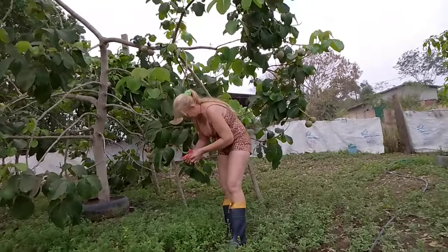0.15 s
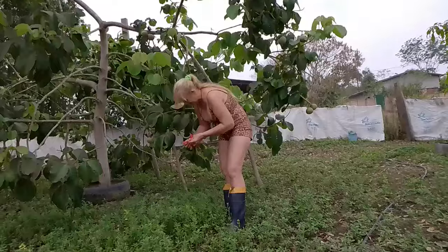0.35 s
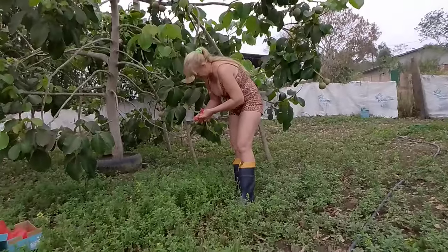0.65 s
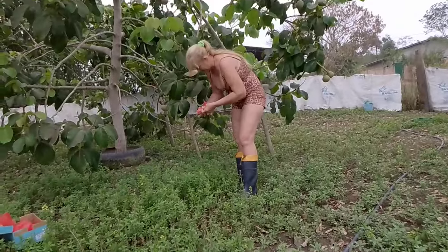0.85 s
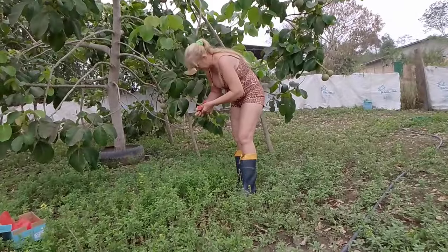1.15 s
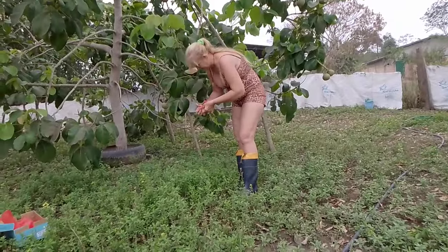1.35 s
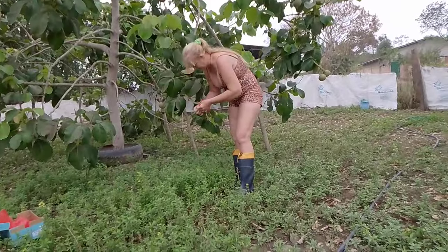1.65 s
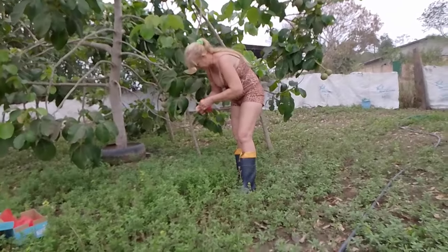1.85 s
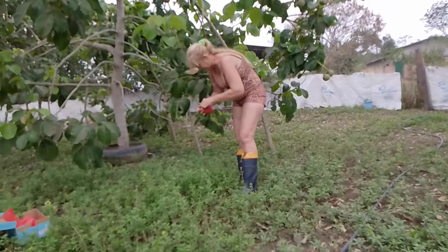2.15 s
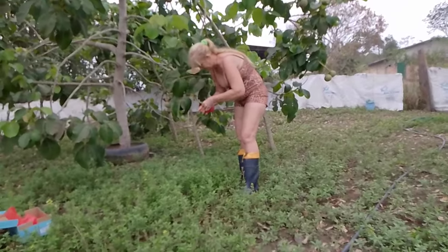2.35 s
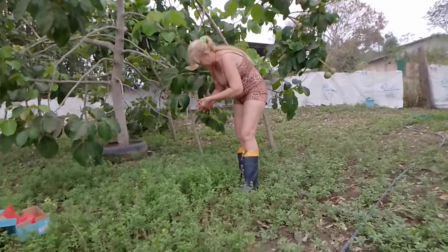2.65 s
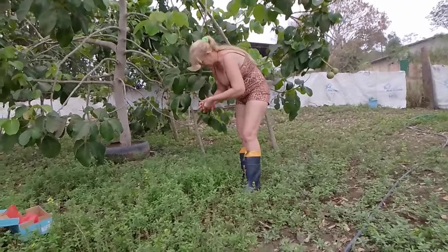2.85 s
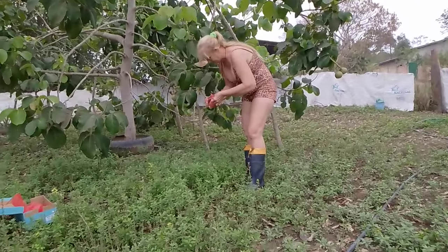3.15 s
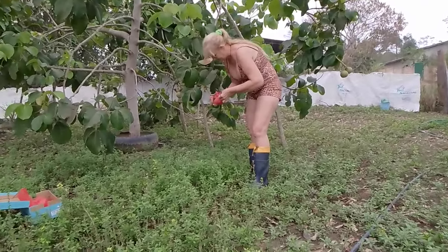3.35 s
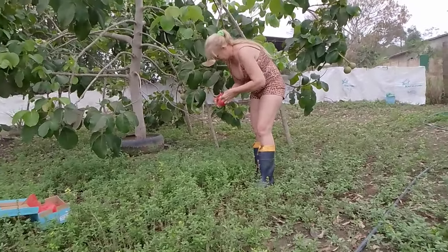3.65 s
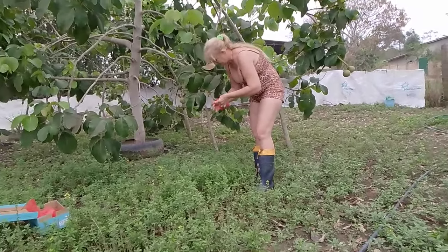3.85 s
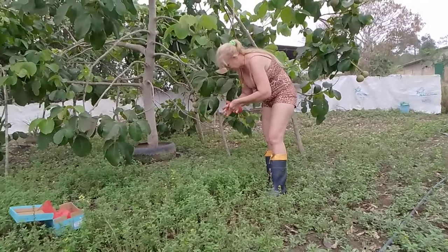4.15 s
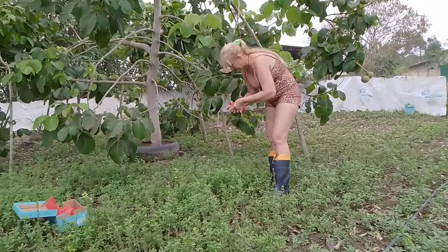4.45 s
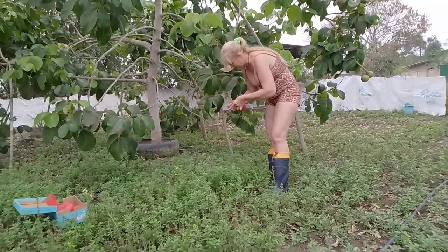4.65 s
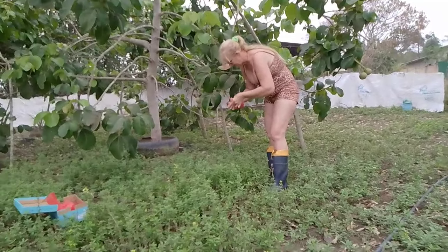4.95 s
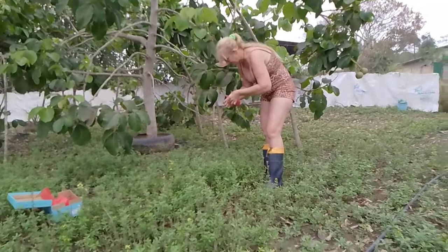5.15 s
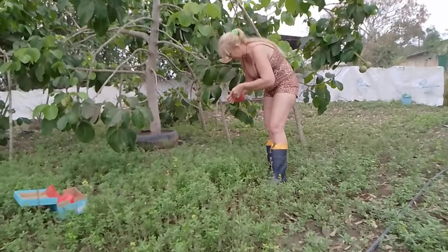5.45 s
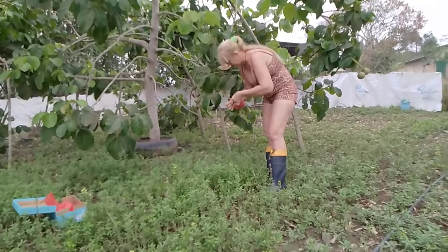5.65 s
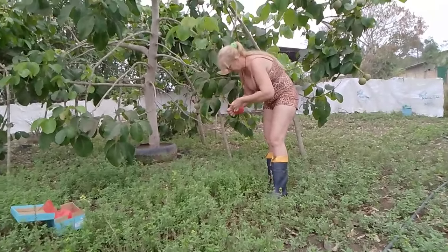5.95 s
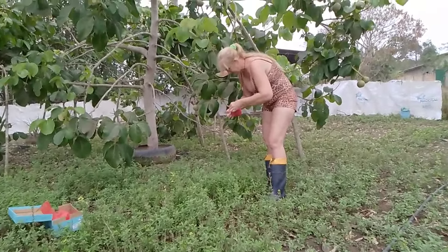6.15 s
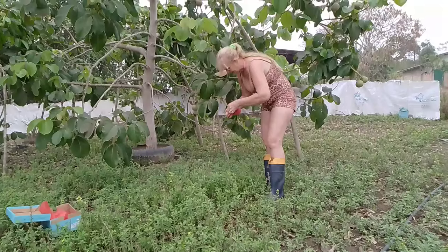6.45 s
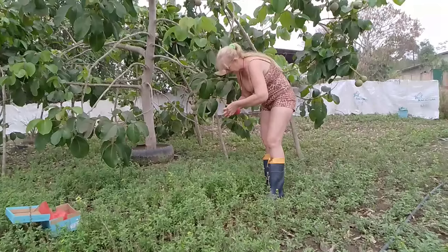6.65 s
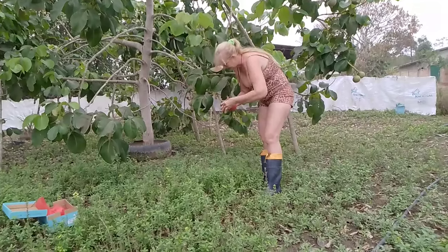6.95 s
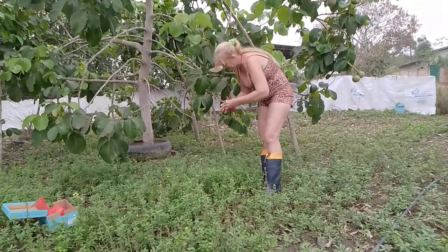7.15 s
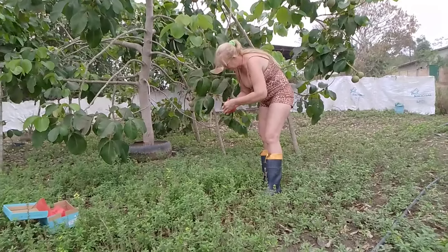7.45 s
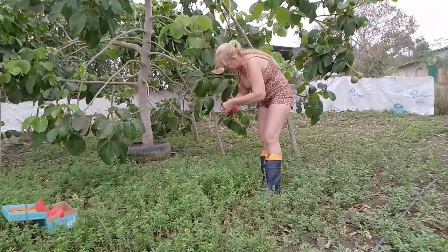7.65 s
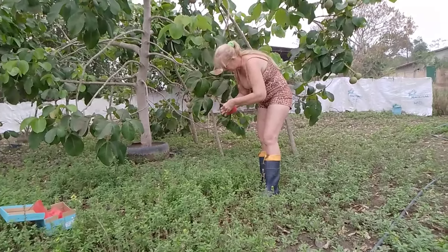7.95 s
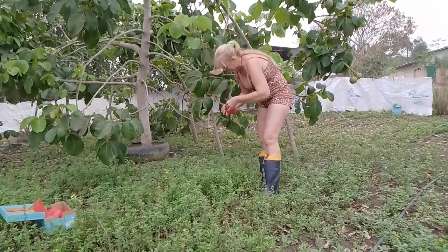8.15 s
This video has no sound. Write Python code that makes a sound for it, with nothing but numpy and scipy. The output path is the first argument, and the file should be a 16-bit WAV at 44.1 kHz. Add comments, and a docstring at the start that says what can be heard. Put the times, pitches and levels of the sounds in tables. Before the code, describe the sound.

Small parrots call in a rural garden. Four shrill whistles sound close to the microphone, about two seconds apart, each falling in pitch and turning raspy at the end. Between them, the flock gives fainter short calls, thin rising chirps and hoarse twitters from the trees. Leaves rustle briefly in the first half, over a faint distant rumble and soft hiss.

```python
"""Small parrots in a rural garden: four shrill falling whistles close by, fainter calls from the flock.
Each whistle is a near-pure syrinx tone that rasps as it drops; trunks and leaves scatter the calls.
Thin rising chirps and hoarse twitters come from the trees, with spells of leaf rustle and dull puffs.
Underneath: a low hum, plus distant rumble and soft hiss that swell with loud calls and sink back."""
import sys
import numpy as np
from scipy import signal
from scipy.fft import rfft, irfft
from scipy.io import wavfile
from scipy.ndimage import uniform_filter1d, map_coordinates

SR = 44100
rng = np.random.default_rng(int(sys.argv[2]) if len(sys.argv) > 2 else 0)


def persist_wave(psi):
    """Save psi, clipped to +-1, as 16-bit WAV."""
    counts = np.round(np.clip(psi, -1, 1) * 32767).astype(np.int16)
    wavfile.write(sys.argv[1], SR, np.atleast_2d(counts).T)


N = 366030
TIME_S = np.arange(N) / SR
FREQ_HZ = np.maximum(np.fft.rfftfreq(N, 1 / SR), 1)

# Base spectrum of the background: freq_hz, density_db
AIR_SPECTRUM = [(25, -105), (62, -88.5), (130, -89), (280, -97.5), (460, -105), (620, -111), (1100, -107),
                (1600, -109), (2500, -107.5), (4000, -113), (5500, -116.5), (9000, -116), (12000, -127),
                (15000, -129)]
# Slow drift of the background: time_s, gain_db
AIR_DRIFT = [(0, 3.5), (.19, -11.5), (.33, -1), (.62, -8), (1.3, 3.5), (2, -2.5), (2.32, -10), (2.65, 2.5),
             (3.22, -4.5), (3.8, 5.5), (4.02, -11.5), (4.35, -3), (4.7, -9.5), (5.72, -6.5), (6.95, -0.5),
             (7.32, -9.5), (7.5, -3.5), (8.3, 0.5)]
# Partials of the distant hum: freq_hz, level_db
HUM_PARTIALS = [(61.5, -70.5), (122, -74.5)]
# Hum envelope: time_s, gain_db
HUM_ENVELOPE = [(.6, -1), (.8, 8.5), (1.1, 16), (1.75, 15.5), (2.2, -5)]
# Dull puffs: start_s, length_s, centre_hz, level_db
PUFFS = [(1.437, 0.27, 604, -59.5), (2.924, 0.13, 630, -66.5), (3.657, 0.037, 1220, -54)]
# Spells of leaf rustle: start_s, length_s, level_db
LEAF_SPELLS = [(0.78, 0.36, -73), (1.236, 0.094, -52.5), (2.462, 0.4, -68.5), (3.281, 0.35, -59.5),
               (3.587, 0.31, -64)]
# Thin rising chirps: start_s, length_s, first_hz, last_hz, level_db
CHIRPS = [(1.628, 0.026, 8270, 11200, -43), (2.875, 0.036, 7000, 9600, -56),
          (5.555, 0.021, 7370, 9860, -67.5), (8.255, 0.044, 7460, 8400, -63)]
# Hoarse high twitters: start_s, length_s, first_hz, last_hz, level_db
TWITTERS = [(.34, .17, 8300, 9070, -76), (3.52, 0.18, 8410, 7010, -55.5), (4.2, 0.26, 8580, 6720, -69),
            (4.95, 0.16, 8600, 9060, -73.5), (6.61, 0.21, 8040, 6470, -63), (7.52, 0.22, 7350, 6700, -66.5)]
# Short flock calls, mostly falling: start_s, length_s, first_hz, last_hz, level_db
FLOCK_CALLS = [(0, 0.048, 3880, 3140, -64), (.02, 0.47, 4130, 3866, -74.5), (.26, 0.047, 4020, 2790, -65.5),
               (.43, .06, 3950, 2950, -71), (.71, 0.077, 5050, 4130, -69.5),
               (.86, 0.046, 3960, 3794, -63.5), (.917, 0.035, 3420, 2800, -59),
               (1.21, 0.2, 3920, 3816, -53.5), (1.58, .17, 4100, 3670, -60.5), (2.38, 0.2, 4060, 3450, -72),
               (3.42, .16, 4056, 4060, -50), (3.98, 0.096, 3960, 3070, -65.5),
               (4.81, 0.074, 4540, 3085, -65.5), (4.98, 0.074, 3930, 3750, -73),
               (5.3, 0.11, 5170, 3760, -68.5), (5.33, 0.053, 3300, 2760, -65),
               (5.423, 0.024, 4150, 2930, -58), (5.68, 0.22, 4200, 3500, -72.5),
               (5.86, 0.063, 4980, 3930, -68.5), (5.945, 0.036, 3840, 3040, -60.5),
               (6.14, 0.14, 4770, 3785, -50), (6.25, 0.039, 3150, 2110, -46.5),
               (6.66, 0.17, 5010, 3020, -59.5), (6.82, 0.21, 5660, 2480, -61),
               (7.4, 0.088, 4660, 2940, -64), (7.58, .13, 4730, 2840, -62), (7.94, .21, 4360, 4150, -54)]
# Long parrot calls, four loud and two faint: start_s, full_voice_s, end_s, lead_hz, entry_hz, held_hz,
# last_hz, sag_hz_per_s, dip_hz, dip_delay_s, drop_s, entry_s, level_db, overtone_db
WHISTLES = [(0.962, 1.06, 1.342, 4680, 4193, 3148, 2295, 2410, 91, 0.071, 0.088, 0.021, -29, 3.5),
            (1.944, 1.942, 2.2, 4630, 4600, 3830, 3200, 498, -5, 0.052, 0.073, .01, -66, 3),
            (3.15, 3.337, 3.556, 3990, 3614, 3213, 2315, 3206, 179.5, 0.043, 0.053, 0.047, -29.5, 3),
            (4.209, 4.227, 4.41, 4300, 4100, 4095, 3120, 684, 4.5, .04, .1, 0.015, -57.5, -1),
            (5.981, 6.08, 6.368, 4240, 3796, 3222, 2295, 3083, 229.5, 0.0356, .064, 0.047, -27.5, -1),
            (7.78, 8.002, 8.153, 4197, 3798, 3172, 2270, 3850, 239.5, 0.014, 0.048, 0.018, -27.5, -1)]


def undb(db):
    """Decibels to gain."""
    return 10 ** (np.asarray(db) / 20)


def walk(rate_hz, size=N):
    """Smooth random curve, spread near 1."""
    at = np.arange(size) * rate_hz / SR
    return map_coordinates(rng.standard_normal(16384), [at % 16383], order=2)


def noise(gain):
    """Spectrally shaped noise; gain 1 is 0 dB per Hz."""
    return irfft(rfft(rng.standard_normal(N)) * gain, N) * np.sqrt(SR / 2)


def band(centre_hz, width_oct):
    """Gaussian band on a log frequency axis."""
    return np.exp(-(np.log2(FREQ_HZ / centre_hz) / width_oct) ** 2 / 2)


def arch(start_s, length_s):
    """Half-sine envelope."""
    return np.sin(np.pi * np.clip((TIME_S - start_s) / length_s, 0, 1))


def mottle(x, depth_db, patch_hz, patch_s=.22):
    """Narrow bands swell and fade independently: an uneven murmur."""
    hz, t, spectrum = signal.stft(x, SR, nperseg=2048)
    grid = np.meshgrid(hz / patch_hz, t / patch_s, indexing="ij")
    patches = map_coordinates(rng.standard_normal((1024, 128)), grid, order=1, mode="wrap")
    return signal.istft(spectrum * undb(depth_db * patches), SR, nperseg=2048)[1][:N]


def since_loud(calls, threshold_db=-44):
    """Seconds since the calls last exceeded the threshold."""
    amplitude = uniform_filter1d(np.abs(calls), 130) * np.pi / 2
    return TIME_S - np.maximum.accumulate(np.where(amplitude > undb(threshold_db), TIME_S, -10))


def swell(since_s, depth_db, sink_s):
    """Gain that jumps during a loud call, then sinks back."""
    return undb(depth_db * uniform_filter1d(np.exp(-since_s / sink_s), size=130))


def lift(birds, depth_db=4, knee_db=-66):
    """Small gain rise whenever the birds call, even faintly."""
    power = uniform_filter1d(birds ** 2, size=3000)
    return undb(depth_db * power / (power + undb(knee_db) ** 2))


def hollow(air, since_s, depth=.85, delay_s=.19, width_s=.064):
    """Brief dip in the background near call pitch, just after a loud call."""
    call_band = irfft(rfft(air) * band(centre_hz=3700, width_oct=.25), N)
    return air - depth * call_band * np.exp(-((since_s - delay_s) / width_s) ** 2)


def hum():
    """Distant hum: two partials wavering in pitch and level."""
    out = np.zeros(N)
    for freq_hz, level_db in HUM_PARTIALS:
        gain = undb(level_db + 2 * walk(1.4))
        hz = freq_hz * (1 + .01 * walk(2.8))
        out += gain * np.sin(2 * np.pi * np.cumsum(hz) / SR)
    return out * undb(np.interp(TIME_S, *np.transpose(HUM_ENVELOPE)))


def open_air(drift_db, since_s, birds, flicker_db=1.33):
    """Distant rumble, midrange murmur and soft hiss, all swelling with loud calls."""
    hz, density_db = np.transpose(AIR_SPECTRUM)
    colour = undb(np.interp(np.log(FREQ_HZ), np.log(hz), density_db))
    low = 1 / (1 + (FREQ_HZ / 400) ** 4)
    high = 1 / (1 + (5000 / FREQ_HZ) ** 6)
    rumble = mottle(noise(colour * np.sqrt(low)), depth_db=2.5, patch_hz=43)
    rumble *= undb(.43 * drift_db) * swell(since_s, depth_db=12.5, sink_s=.31)
    murmur = mottle(noise(colour * np.sqrt((1 - low) * (1 - high))), depth_db=6.5, patch_hz=70)
    murmur *= undb(drift_db + flicker_db * walk(40)) * swell(since_s, depth_db=11, sink_s=.23)
    hiss = mottle(noise(colour * np.sqrt(high)), depth_db=3, patch_hz=201.2)
    hiss *= undb(.67 * drift_db + flicker_db * walk(60)) * swell(since_s, depth_db=14.5, sink_s=.23)
    deep_bass = noise(undb(-96 - 24 * np.log2(FREQ_HZ / 75) ** 2))
    deep_bass *= swell(since_s, depth_db=20.5, sink_s=.35) - 1.5  # faint between calls
    return rumble + deep_bass + (murmur + hiss) * lift(birds)


def puffs():
    """Dull noise bursts, each around one broad resonance."""
    out = np.zeros(N)
    for start_s, length_s, centre_hz, level_db in PUFFS:
        burst = noise(band(centre_hz, width_oct=.66))
        out += undb(level_db) * burst / burst.std() * arch(start_s, length_s)
    return out


def leaves(grain_db=3, flicker_db=3):
    """Short spells of bright, crackly rustling."""
    crackle = noise(band(centre_hz=7500, width_oct=.62))
    crackle *= undb(grain_db * walk(600) + flicker_db * walk(35))
    spells = sum(undb(db) * arch(start_s, length_s) for start_s, length_s, db in LEAF_SPELLS)
    return spells * crackle / crackle.std()


def scatter(x, t60_s, build_s):
    """Dense echoes off leaves and trunks; unit-energy response."""
    t = TIME_S[:SR]
    envelope = undb(-60 * t / t60_s) * (1 - np.exp(-t / build_s))
    echoes = rng.standard_normal(SR) * rng.standard_normal(SR) * envelope
    return signal.fftconvolve(x, echoes / np.linalg.norm(echoes))[:N]


def glides(notes, rasp, rasp_rate_hz, flutter_db=4, bow=.035, wander=.083):
    """Bird notes on bowed pitch sweeps; longer ones rasp more, wider ones wander more."""
    out = np.zeros(N)
    for start_s, length_s, first_hz, last_hz, level_db in notes:
        on = (TIME_S >= start_s) & (TIME_S < start_s + length_s)
        progress = (TIME_S[on] - start_s) / length_s
        size = len(progress)
        arc = np.sin(np.pi * progress)
        jitter = rasp * min(length_s / .1, 1) ** 2 * walk(rasp_rate_hz, size)
        bend = wander * abs(np.log(first_hz / last_hz)) * walk(50, size)
        hz = (first_hz + (last_hz - first_hz) * (progress - bow * arc)) * (1 + jitter + bend)
        envelope = undb(level_db + flutter_db * walk(90, size)) * np.sqrt(np.abs(arc))
        out[on] += envelope * np.sin(2 * np.pi * np.cumsum(hz) / SR)
    return out


def far_flock(pitch_hz=3800, spread_oct=.9, floor_db=-83, count=130):
    """Distant birds: faint falling notes at random moments."""
    when, length, pitch, fall, loudness = rng.random((count, 5)).T
    start_s = (np.arange(count) + when) / count * N / SR
    length_s = .04 + .1 * length
    first_hz = pitch_hz * 2 ** (spread_oct * (pitch - .5))
    last_hz = first_hz * (.96 - .3 * fall)
    notes = np.transpose([start_s, length_s, first_hz, last_hz, floor_db + 7 * loudness])
    return glides(notes, rasp=.022, rasp_rate_hz=180)


def syrinx(hz, level_db, overtone_db, waver=.0076, rasp=.032, flutter_db=1.15, break_hz=2480):
    """Near-pure whistle; rasp and overtones grow as it falls, and below break_hz the period doubles."""
    size = len(hz)
    slack = np.clip((3350 - hz) / 700, -1, 1)
    doubling = np.clip((break_hz - hz) / 120, 0, 1)
    jitter = waver * walk(260, size) + rasp * np.maximum(slack, 0) ** 2 * walk(700, size)
    phase = 2 * np.pi * np.cumsum(hz * (1 + jitter)) / SR
    overtones = undb(-29) * np.sin(2 * phase) + undb(-44) * np.sin(3 * phase)
    overtones *= undb(overtone_db + 10 * slack + 5.4 * walk(70, size))
    half_harmonics = np.sin(3 * phase / 2) + .082 * np.sin(phase / 2)
    tone = np.sin(phase) + overtones + undb(-14) * doubling * half_harmonics
    fade = signal.windows.tukey(size, min(.0075 * SR / size, 1))
    return tone * undb(level_db + flutter_db * walk(130, size)) * fade


def whistles(scoop_hz=596, scoop_s=.008, overshoot_hz=150, overshoot_s=.022, settle_s=.04):
    """Parrot calls: soft high lead-in, full voice settling on a sagging note, final drop."""
    out = np.zeros(N)
    for (start_s, full_voice_s, end_s, lead_hz, entry_hz, held_hz, last_hz, sag_hz_per_s,
         dip_hz, dip_delay_s, drop_s, entry_s, level_db, overtone_db) in WHISTLES:
        on = (TIME_S >= start_s) & (TIME_S < end_s)
        t = TIME_S[on]
        voiced_s = np.maximum(t - full_voice_s, 0)
        lead = np.clip((t - start_s) / (full_voice_s - start_s), 0, 1)
        scoop = np.exp(-(t - start_s) / scoop_s)  # slides in from below
        drop = np.sin(np.pi / 2 * np.maximum(1 - (end_s - t) / drop_s, 0)) ** 3

        onset_hz = lead_hz + (entry_hz - lead_hz) * lead
        hz = held_hz + sag_hz_per_s * (end_s - drop_s - t)
        hz += (onset_hz - hz) * np.exp(-(voiced_s / settle_s) ** 2)
        hz += overshoot_hz * np.exp(-((t - start_s) / overshoot_s - 1) ** 2) - scoop_hz * scoop
        hz -= dip_hz * np.exp(-((t - full_voice_s - dip_delay_s) / .035) ** 2)  # as the voice opens
        hz += (last_hz - hz) * drop

        lead_db = -34 + 13.5 * np.sin(np.pi * lead / 2)
        voice_db = -6 * (voiced_s < entry_s) - 3 * drop  # enters at half voice, eases in the drop
        shape_db = np.where(t < full_voice_s, lead_db, voice_db) - 10.5 * scoop
        out[on] += syrinx(hz, level_db + uniform_filter1d(shape_db, size=130), overtone_db)
    return out


def scene():
    """Mono mix; the farther the bird, the more of its sound arrives via the trees."""
    drift_db = np.interp(TIME_S, *np.transpose(AIR_DRIFT))
    near = whistles()
    flock = glides(FLOCK_CALLS, rasp=.012, rasp_rate_hz=400)
    far = far_flock() * undb(.5 * drift_db)
    high_calls = glides(CHIRPS, rasp=.12, rasp_rate_hz=1400)
    high_calls += glides(TWITTERS, rasp=.095, rasp_rate_hz=570, flutter_db=5.5)
    close = near + undb(-17.5) * scatter(near, t60_s=.41, build_s=.0096)
    close += undb(-12.5) * scatter(near, t60_s=.18, build_s=.069)
    around = undb(-2.5) * flock + far + undb(-2) * scatter(flock + far, t60_s=.18, build_s=.005)
    treetops = undb(-5.5) * high_calls + undb(-.5) * scatter(high_calls, t60_s=.27, build_s=.00089)
    since_s = since_loud(near)
    background = hollow(hum() + open_air(drift_db, since_s, near + around), since_s)
    return (background + puffs() + leaves() + treetops + around + close)[None]


def record(dry):
    """Steep low-pass at 15.6 kHz."""
    return signal.sosfilt(signal.ellip(10, .2, 70, 15600, fs=SR, output="sos"), dry)


dry = scene()
out = record(dry)
persist_wave(out)
```